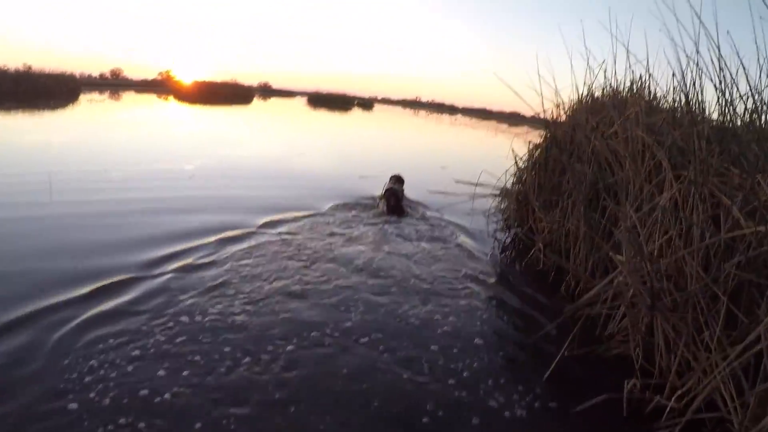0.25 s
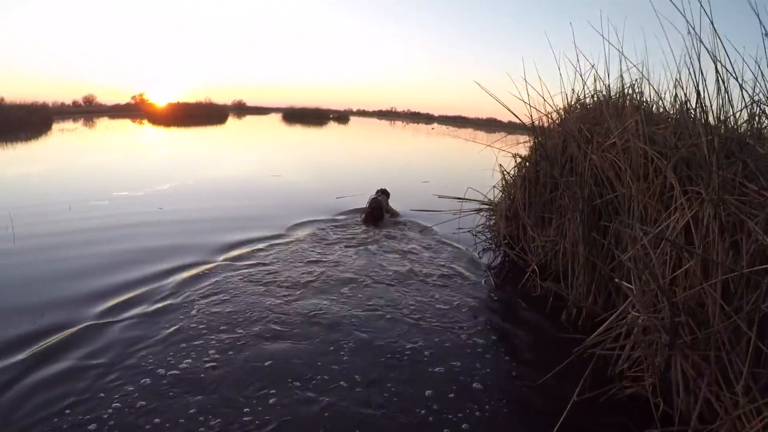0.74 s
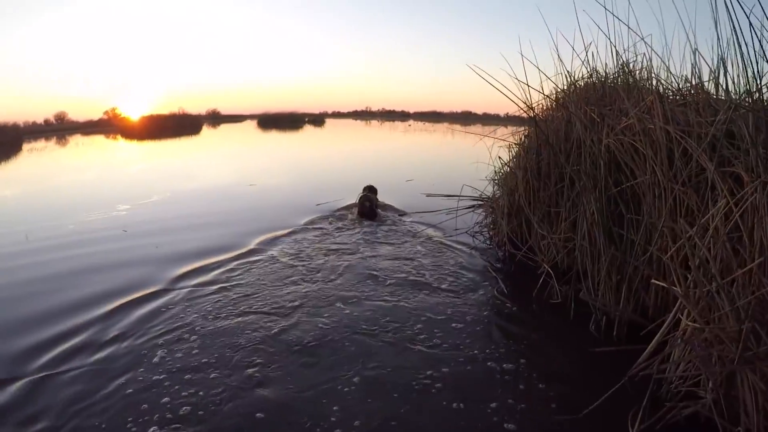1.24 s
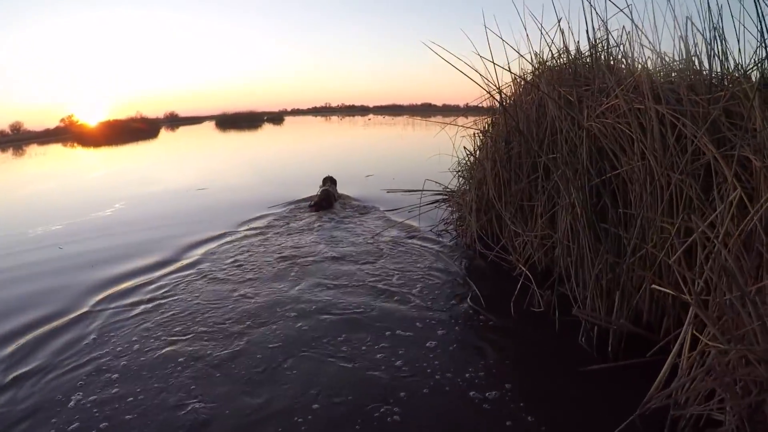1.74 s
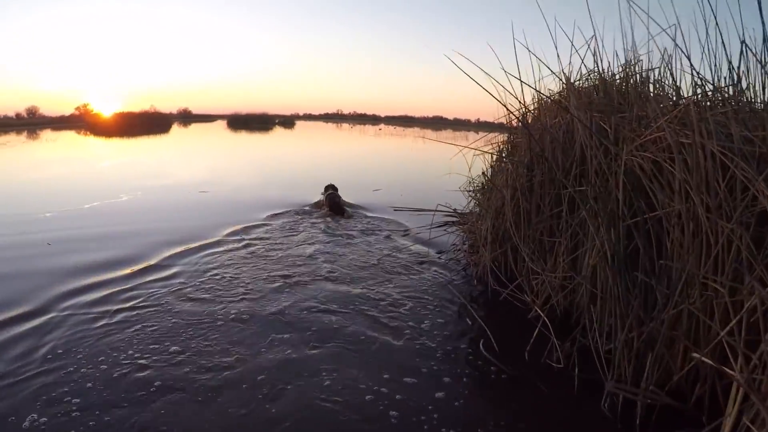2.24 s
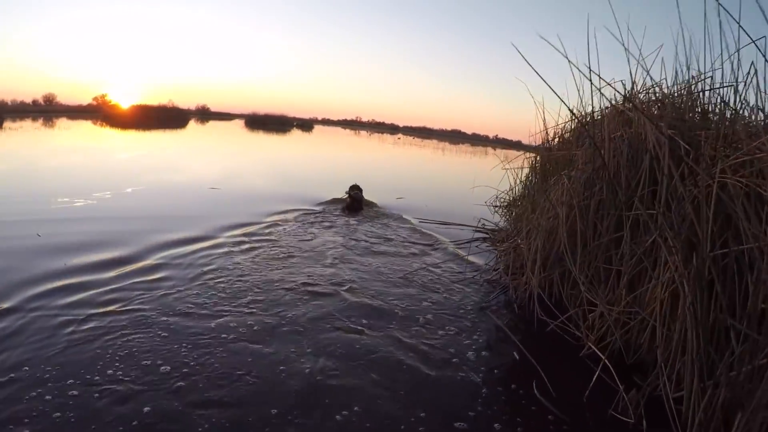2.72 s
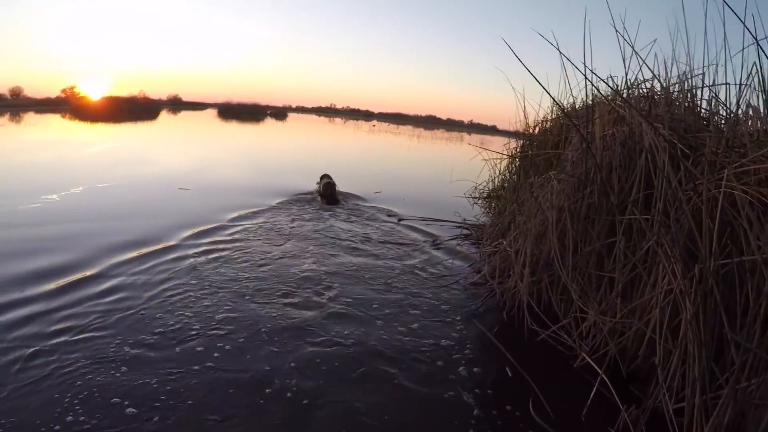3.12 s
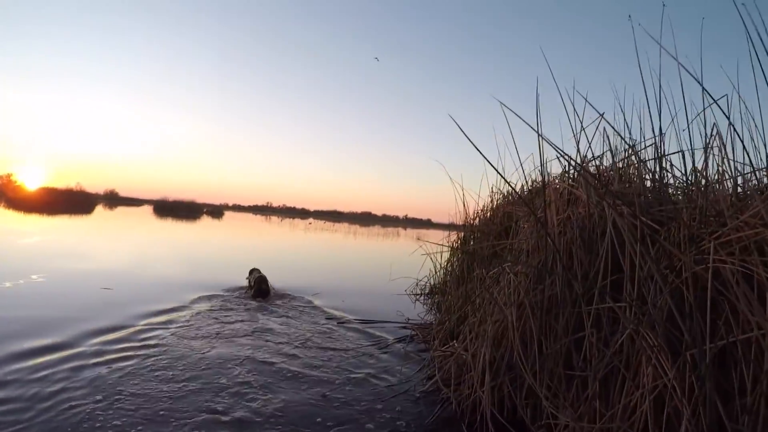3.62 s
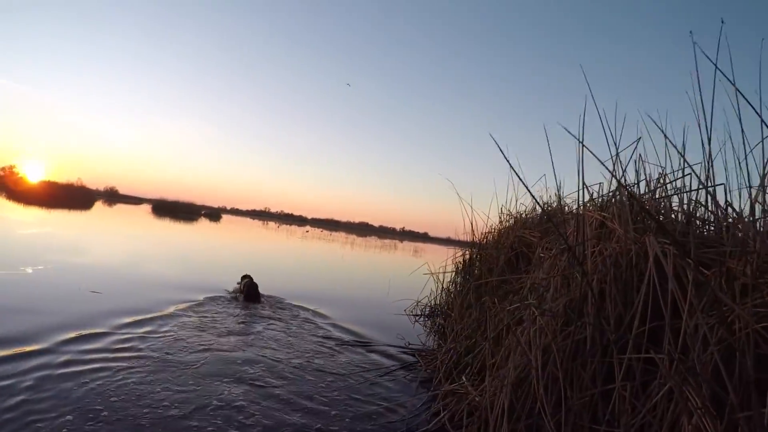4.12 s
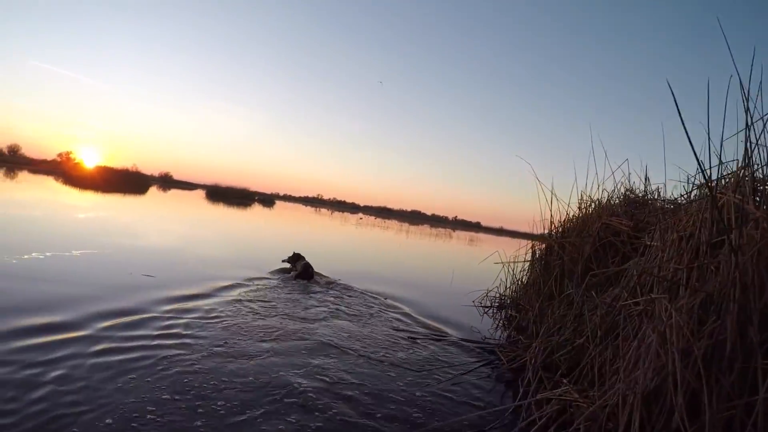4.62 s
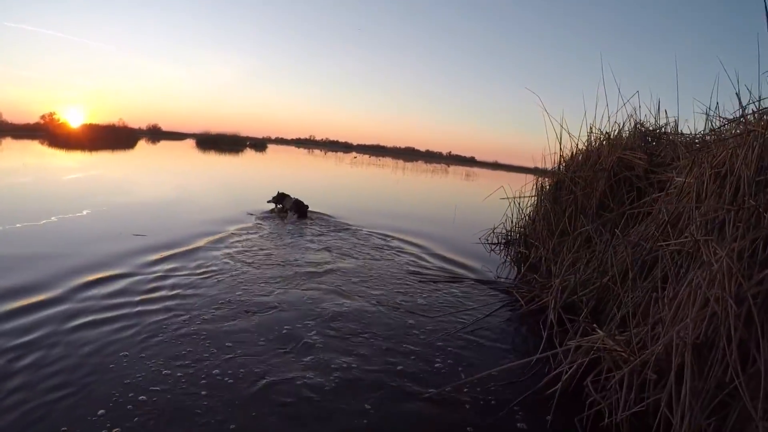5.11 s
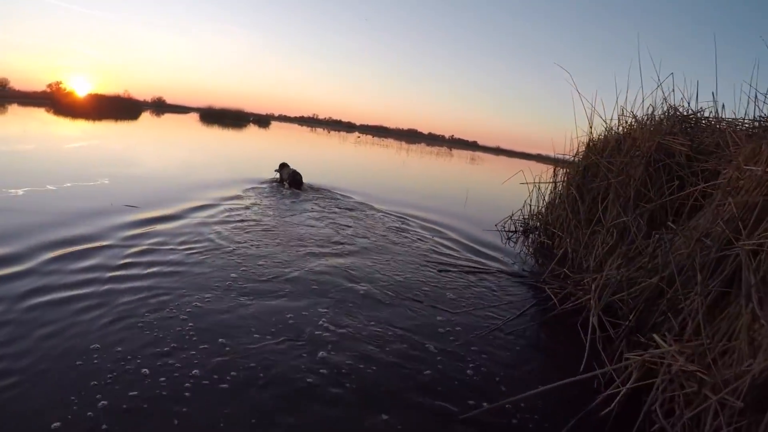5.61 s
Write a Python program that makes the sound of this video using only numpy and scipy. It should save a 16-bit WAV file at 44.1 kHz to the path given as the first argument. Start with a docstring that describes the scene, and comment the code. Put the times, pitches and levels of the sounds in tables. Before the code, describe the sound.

Legs push through shallow water in slow, regular strides, each a gurgling slosh ending in a small splash. The beginning is nearly windless, then a deep glug and sharp knocks on the body-worn camera arrive around one second. The brightest hissing splash and a thumping gust follow before two seconds. Afterward the wading is gentler, with droplets and dull wind rumble, in open air without echo.

```python
"""A shallow marsh, open and without walls, heard by a body-worn camera as someone wades.
Strides churn up a slosh of bubbles; waves break into splash, ticking crackle and a hiss of spray.
Air pockets glug, drops tick, and sheets of water slap: all are ringing bubbles or filtered noise.
Blows ring the camera housing, water smacks beside it, and wind rumbles as noise on its two ports.
A limiter pulls the gain down on loud peaks."""
import sys
import numpy as np
from scipy import signal
from scipy.fft import rfft, irfft
from scipy.io import wavfile
from scipy.ndimage import uniform_filter1d

SR = 44100
rng = np.random.default_rng(int(sys.argv[2]) if len(sys.argv) > 2 else 0)


def generate_wav(sig):
    """Save sig (samples, or channels by samples) to the path in sys.argv[1] as 16-bit PCM at SR."""
    pcm = np.round(np.clip(np.atleast_2d(sig).T, -1, 1) * 32767).astype(np.int16)
    wavfile.write(sys.argv[1], SR, pcm)


N = 258426
TIME = np.arange(N) / SR
HZ = np.fft.rfftfreq(N, 1 / SR)


def gain_of(db):
    """Decibels to gain."""
    return 10 ** (np.asarray(db) / 20)


def evened(x):
    """Scales to rms 1."""
    return x / np.sqrt(np.mean(x ** 2) + 1e-20)


def read(points):
    """Interpolates a table over log frequency."""
    f, value = np.transpose(points)
    return np.interp(np.log(HZ + 1), np.log(f + 1), value)


def add(mix, start_s, sound):
    """Mixes a sound in at start_s."""
    part = mix[round(start_s * SR):][:len(sound)]
    part += sound[:len(part)]


def coloured(x, colour):
    """Filters by a colour table."""
    return irfft(rfft(x) * gain_of(read(colour)), N)


def unit_band(pair, band_hz):
    """Scales a pair so that its mid signal has rms 1 within a band."""
    inside = (HZ > band_hz[0]) & (HZ < band_hz[1])
    mid = irfft(rfft(pair.mean(0)) * inside, N)
    return pair / np.std(mid)


def flutter(rate_hz, depth_db):
    """Gain wandering at random below about rate_hz, with an rms depth in dB."""
    slow = irfft(rfft(rng.standard_normal(N)) / (1 + (HZ / rate_hz) ** 4), N)
    return gain_of(depth_db * evened(slow))


# left port against right: (frequency [Hz], left lead [rad])
PORT_PHASE = [(100, 1.5), (350, -1.04), (700, -0.82), (1200, -3.5), (1900, -4.5), (3500, -5), (5200, -5.5),
              (7000, -8), (11000, -12)]
# left port against right: (frequency [Hz], left minus right [dB])
PORT_BALANCE = [(60, 0), (110, -1.0), (200, 0.5), (380, 1.5), (690, 0.5), (1270, -6), (2340, 0),
                (4320, -5.0), (7960, -7.5), (14700, -3)]


def ports(x):
    """Sound bends round the housing: mostly later and weaker at the left port."""
    half = gain_of(read(PORT_BALANCE) / 2) * np.exp(.5j * read(PORT_PHASE))
    return irfft(rfft(x) * np.array([half, 1 / half]), N)


def bubble(hz, cycles, rise, onset_cycles):
    """Air bubble: soft start, ring to -60 dB over the cycles, pitch gliding (up if rise > 0)."""
    turns = np.arange(int(cycles * SR / hz) + 2) * hz / SR
    swell = 1 - np.exp(-(turns / onset_cycles) ** 2)
    phase = 2 * np.pi * turns * (1 + rise * turns / cycles)
    ring = swell * gain_of(-60 * turns / cycles) * np.sin(phase)
    return ring / abs(ring).max()


CLUMP_S, CLUMP_DB = 0.025, 3  # step length; level per standard deviation


def cloud(band_hz, per_s, cycles, rise, scatter_db, spread_ms, wash, onset_cycles=0.56, count=36):
    """Bubbles of many sizes, clumped in level and gliding up or down, over a noise wash of tiny ones."""
    pair = np.zeros((2, N))
    clumps = evened(uniform_filter1d(rng.standard_normal((count, SR)), size=4, axis=0))
    for hz, clump in zip(np.geomspace(*band_hz, count), clumps):
        chance, size = rng.random(N), rng.standard_exponential(N)
        at = np.flatnonzero(chance < per_s / count / SR)
        # random lag between ports: many directions
        lag = (rng.standard_normal(N)[at] * spread_ms * SR / 1000).round().astype(int)
        clump_db = CLUMP_DB * np.minimum(clump[(TIME[at] / CLUMP_S).astype(int) % SR], 2)
        strength = gain_of(scatter_db * np.minimum(size[at], 3) + clump_db)
        clicks = np.zeros((2, N))
        clicks[0, at] = strength
        clicks[1, (at + lag) % N] = strength
        ring = bubble(hz, cycles, rise * rng.uniform(-1.2, 1.94), onset_cycles)
        pair += signal.oaconvolve(clicks, ring[None] / np.linalg.norm(ring), axes=1)[:, :N]
    pink = irfft(rfft(rng.standard_normal((2, N))) / np.sqrt(HZ + band_hz[0]), N)
    return evened(pair) + wash * evened(pink)


def resonate(x, hz, width_hz):
    """Resonance of gain 1 following the curve hz: shift to 0 Hz, low-pass, shift back."""
    turn = np.exp(2j * np.pi * np.cumsum(hz) / SR)
    r = np.exp(-np.pi * width_hz / SR)
    return 2 * (turn * signal.lfilter([1 - r], [1, -r], x / turn)).real


# legs pushing through water:
# (start [s], build-up [s], length [s], level [dB], easing [dB/s])
STRIDES = [(-0.06, 0.099, 0.28, -38.5, -7), (0.474, 0.028, 0.69, -37.5, -6),
           (1.276, 0.043, 0.81, -35, 10.5), (2.08, 0.21, 0.55, -32, 21), (2.998, 0.12, 0.58, -35, 2),
           (3.789, 0.2, 0.82, -34.5, 5.5), (4.73, 0.43, 0.77, -32.5, 9)]
SETTLE_DB_PER_S = 144  # added once the leg stops
LAP_SLOSH_DB = -43.5  # wake between strides


def push():
    """Slosh level: each stride builds, eases off (or grows) and settles, over the lapping wake."""
    power = gain_of(LAP_SLOSH_DB) ** 2
    for start, build, length, db, easing in STRIDES:
        age = np.maximum(TIME - start, 0)
        fade_db = easing * np.maximum(age - build, 0)
        fade_db = fade_db + SETTLE_DB_PER_S * np.maximum(age - length, 0)
        power = power + (np.minimum(age / build, 1) * gain_of(db - fade_db)) ** 2
    return np.sqrt(power)


# slosh spectrum: (frequency [Hz], gain [dB])
SLOSH_COLOUR = [(90, -62), (120, -19), (150, -4), (300, -2), (500, -4), (850, -2), (1300, -3.5),
                (2200, -18)]
# bubbles grow as the leg digs in: the gurgle slides down from GURGLE_HZ
GURGLE_HZ, GURGLE_FALL_OCTAVES_PER_S, GURGLE_WIDTH_HZ, GURGLE_DB = 765, 3.9, 490, -6


def slosh():
    """Small and large bubbles, with a resonance sliding down through each stride as bubbles grow."""
    starts = np.transpose(STRIDES)[0]
    age = TIME - starts[np.searchsorted(starts, TIME) - 1]
    small = cloud((380, 1700), per_s=850, cycles=28.6, rise=0.26, scatter_db=2.0, spread_ms=0.15,
                  wash=0.23, onset_cycles=0.76, count=24)
    large = cloud((135, 430), per_s=800, cycles=10.6, rise=0.2, scatter_db=2.0, spread_ms=0.23,
                  wash=0.18, onset_cycles=0.78, count=18)
    water = small + gain_of(-6.5) * large
    gurgle_hz = GURGLE_HZ * 2 ** (-GURGLE_FALL_OCTAVES_PER_S * age)
    water = water + gain_of(GURGLE_DB) * resonate(water, gurgle_hz, GURGLE_WIDTH_HZ)
    water = ports(coloured(water, SLOSH_COLOUR)) * flutter(rate_hz=6.8, depth_db=1.37)
    return unit_band(water, (280, 900))


# waves breaking:
# (crest time [s], rise [s], fall [s], splash level [dB], spray level [dB])
WAVES = [(0.161, 0.35, 0.15, -32.5, -30), (0.83, 0.033, 0.26, -44, -36), (0.992, 0.3, 0.029, -33, -28.5),
         (1.121, 0.19, 0.084, -32, -27.5), (1.185, 0.11, 0.036, -31.5, -42), (1.348, 0.14, 0.11, -37, -40),
         (1.481, 0.077, 0.036, -28.5, -32.5), (1.705, 0.17, 0.19, -34, -26.5),
         (1.818, 0.15, 0.14, -25.5, -24), (2.557, 0.31, 0.19, -33, -33.5), (2.56, 0.035, 0.059, -53, -31),
         (3.46, 0.29, 0.23, -34, -34.5), (3.59, 0.22, 0.09, -32.5, -34), (4.42, 0.18, 0.15, -32, -33.5),
         (5.09, 0.19, 0.21, -35.5, -37.5), (5.31, 0.32, 0.32, -33, -35.5), (5.459, 0.14, 0.077, -31, -31)]
WAVE_DROP_DB, WAVE_ROUNDNESS = 15.5, 1  # drop over one rise or fall time; 1 = pointed crest, 2 = round
LAP_SPLASH_DB, LAP_SPLASH_GROWTH_DB_PER_S = -46, 0.42
LAP_SPRAY_DB, LAP_SPRAY_FADE_DB_PER_S = -48, 0.27


def breaking():
    """Splash and spray levels: each wave swells to a crest and collapses, over the lapping wake."""
    splash_power = gain_of(LAP_SPLASH_DB + LAP_SPLASH_GROWTH_DB_PER_S * TIME) ** 2
    spray_power = gain_of(LAP_SPRAY_DB - LAP_SPRAY_FADE_DB_PER_S * TIME) ** 2
    for crest, rise, fall, splash_db, spray_db in WAVES:
        away = np.maximum((crest - TIME) / rise, (TIME - crest) / fall)
        swell = gain_of(-WAVE_DROP_DB * np.minimum(away, 10) ** WAVE_ROUNDNESS)
        splash_power = splash_power + (gain_of(splash_db) * swell) ** 2
        spray_power = spray_power + (gain_of(spray_db) * swell) ** 2
    return np.sqrt(splash_power), np.sqrt(spray_power)


# splash spectrum: (frequency [Hz], gain [dB])
SPLASH_COLOUR = [(300, -24), (850, -10.5), (1200, -3.5), (1750, 1), (2100, -1.5), (2600, -11.5), (3300, -9),
                 (4300, -25)]


def splash():
    """Small bubbles and droplets of the breaking wave: a bubble cloud over strong noise."""
    water = cloud((800, 4200), per_s=1100, cycles=58, rise=0.12, scatter_db=2.0, spread_ms=0.031, wash=0.94)
    water = ports(coloured(water, SPLASH_COLOUR)) * flutter(rate_hz=8.0, depth_db=0.15)
    return unit_band(water, (1200, 2500))


def crackle():
    """Larger droplets standing out of the splash: sparse short rings of widely scattered level."""
    ticks = cloud((1500, 8000), per_s=160, cycles=8.8, rise=0, scatter_db=6.0, spread_ms=0.027,
                  wash=0, count=16)
    return gain_of(-10.5) * evened(ports(ticks))


# spray spectrum: (frequency [Hz], gain [dB])
SPRAY_COLOUR = [(1200, -19), (2400, -3), (3300, -0.5), (4400, -1), (5400, 2.5), (7200, 7), (8300, -1),
                (10200, -2.5), (11500, -8), (13500, -13), (15000, -54)]
# second colour of the hiss: (frequency [Hz], gain [dB])
SECOND_COLOUR = [(2400, 0.5), (3300, 5), (4400, 0.5), (6500, 1), (9000, 2), (14000, -2)]
# two times [s] for the interpolation of the hiss colour, in descending order:
# the colour steps at the second one
COLOUR_TIMES_S = [4.8, 2.5]


def spray():
    """Finest droplets merging into a grainy hiss, which steps to a second colour partway through."""
    water = cloud((2000, 14000), per_s=4000, cycles=58, rise=0.016, scatter_db=1.0, spread_ms=0.028,
                  wash=1.0, count=48)
    share = np.interp(TIME, COLOUR_TIMES_S, [0, 1])
    water = (1 - share) * water + share * coloured(water, SECOND_COLOUR)
    water = ports(coloured(water, SPRAY_COLOUR)) * flutter(rate_hz=25, depth_db=1.27)
    return unit_band(water, (4000, 12000))


# large air pockets closing:
# (time [s], level [dB], pitch [Hz], pitch change over the ring [share])
GULPS = [(0.022, -24, 193, 0.56), (4.951, -25.5, 336, 0.42), (0.646, -28.5, 347, -1.7),
         (0.737, -27, 747, -1.5), (0.76, -23.5, 186, .3), (0.783, -25.5, 365, 0.024),
         (0.835, -26, 160, -0.24), (0.857, -20, 233, -1.14), (1.003, -5.5, 180.4, -0.2),
         (1.054, -16, 189, 0.023), (1.354, -23.5, 552, 0.82), (1.389, -21, 460, -0.96),
         (1.554, -22.5, 278, -1.2), (2.156, -28, 370, 0.57), (2.18, -26.5, 594, 1.1),
         (2.236, -19, 328, -0.37), (2.325, -28, 560, 1.04), (2.619, -26, 447, -0.38),
         (2.88, -28, 674, 0.74), (2.912, -29, 730, 0.7), (3.228, -23.5, 352, 0.15), (3.84, -28.5, 630, 0.7),
         (4.284, -23.5, 230, -0.9), (4.515, -18.5, 151, -0.51), (4.541, -25, 195, 0.77),
         (4.803, -25.5, 354, -0.48), (5.331, -14, 149, -1.15), (5.354, -16.5, 195, -0.8)]
GULP_RING_S, GULP_SWELL_S = 0.0615, 0.005


def gulps():
    """Air pockets closing behind a leg: glugs sliding in pitch as they rise or are dragged under."""
    out = np.zeros(N)
    for s, db, hz, glide in GULPS:
        add(out, s, gain_of(db) * bubble(hz, hz * GULP_RING_S, glide / 2, hz * GULP_SWELL_S))
    high_pass = signal.butter(4, 115, "highpass", fs=SR, output="sos")
    return ports(signal.sosfilt(high_pass, out))


# drops landing near the camera: (time [s], level [dB], pitch [Hz])
DROPS = [(0.163, -21, 6160), (2.3652, -13, 5940), (2.4527, -14, 6260), (2.841, -17.5, 1700),
         (2.982, -26, 1710), (3.816, -20, 2070), (3.817, -18, 6000), (4.433, -8.5, 1790),
         (4.521, -20, 3300), (5.419, -13.5, 3500), (5.4848, -14, 6070), (5.541, -13.5, 7300),
         (5.64, -25.5, 6700)]
# tick of a drop on the surface: (frequency [Hz], gain [dB])
TICK_COLOUR = [(500, -14), (1600, 13), (3200, 5), (4400, -21), (6500, 1), (9000, -3), (15000, -24.5)]


def drops():
    """Each drop: a broad noise tick and a very short bubble ring."""
    rings, ticks = np.zeros(N), np.zeros(N)
    t = np.arange(SR // 50) / SR
    for s, db, hz in DROPS:
        add(rings, s, gain_of(db) * bubble(hz, cycles=14, rise=0.023, onset_cycles=1.0))
        add(ticks, s, gain_of(db) * rng.standard_normal(len(t)) * np.exp(-t / 0.0012))
    return ports(rings + gain_of(-5.0) * coloured(ticks, TICK_COLOUR))


# sheets of water slapping down: (time [s], level [dB], pitch [Hz], length [s])
SLAPS = [(0.477, -26, 1230, 0.025), (0.869, -25, 960, .045), (1.001, -14, 2400, 0.0096),
         (1.378, -20, 2230, .02), (1.457, -13.5, 2160, 0.045), (1.924, -19.5, 1550, .012),
         (3.334, -16, 1460, .012), (4.741, -19, 1340, 0.021), (5.067, -15.5, 1800, 0.016)]


def slaps():
    """A falling sheet traps a tight clump of like-sized bubbles."""
    out = np.zeros(N)
    for s, db, hz, length in SLAPS:
        clump = np.zeros(SR // 8)
        for when, size, strength in rng.random((40, 3)):
            pitch_hz = hz * 1.27 ** (2 * size - 1)
            ring = bubble(pitch_hz, cycles=36, rise=0.019, onset_cycles=0.53)
            add(clump, when * length, strength * ring)
        add(out, s, gain_of(db) * clump / abs(clump).max())
    return ports(out)


# water smacking beside the camera:
# (time [s], level [dB], decay [s], pitch [Hz], direction [1 side, 0 front])
SMACKS = [(1.003, -17, 0.0083, 1730, 0), (1.06, -26.5, 0.019, 1320, 0), (1.4093, -13, 0.0017, 1400, 0),
          (1.735, -19, 0.031, 780, 1), (1.852, -24, 0.017, 700, 1), (2.2324, -25.5, .005, 667, 0)]
POPS_PER_S, POP_DAMPING_PER_CYCLE = 2000, 1.05


def smacks():
    """A crack and dying crackle of damped pops; from the side, it presses one port and pulls the other."""
    front, side = np.zeros(N), np.zeros(N)
    t = np.arange(SR // 10) / SR
    for s, db, decay, hz, sideways in SMACKS:
        pops = (rng.random(len(t)) < POPS_PER_S / SR) * rng.standard_normal(len(t))
        pops[0] = 2  # the crack
        pop = np.sin(2 * np.pi * hz * t) * np.exp(-POP_DAMPING_PER_CYCLE * hz * t)
        burst = signal.fftconvolve(pops * np.exp(-t / decay), pop)[:len(t)]
        burst = evened(burst) * np.sqrt(decay / t[-1])
        add(side if sideways > .5 else front, s, gain_of(db) * burst)
    return ports(front) + np.array([side, -side])


# blows on the camera: (time [s], level [dB], contact time [ms], left port lag [ms])
KNOCKS = [(1.011, -5.5, 0.23, 0.72), (1.0169, -2.5, 0.26, 0.68), (1.1988, 0.2, 0.3, -0.38),
          (1.2021, -6, 1.6, 0), (1.221, -11.5, 1.1, 0.36), (1.305, -14, 0.79, 1), (1.4131, -8, 1.22, -0.51)]
# housing resonances: (frequency [Hz], level [dB], t60 [s])
HOUSING = [(63.5, 3, 0.079), (168, 10, 0.028), (266, 8.5, 0.028), (583, -5, 0.017), (920, 14.5, 0.012),
           (1540, -3, 0.013)]


def knocks():
    """Blows press, rebound and ring the housing, nearer port first; longer contact is duller."""
    out = np.zeros((2, N))
    t = np.arange(SR // 6) / SR
    ring = sum(gain_of(db - 60 * t / t60) * np.cos(2 * np.pi * hz * t) for hz, db, t60 in HOUSING)
    for s, db, contact_ms, lag_ms in KNOCKS:
        u = 1000 * t / contact_ms
        force = u * (2 - u) * np.exp(-u)
        blow = signal.fftconvolve(ring, force)[:len(t)]
        for port, at_s in zip(out, (s + lag_ms / 1000, s)):
            add(port, at_s, gain_of(db) * blow / abs(blow).max())
    return out


# breeze picking up from calm: (time [s], level [dB])
BREEZE = [(0.0, -87), (0.8, -62), (1.22, -30), (1.5, -48), (1.95, -25.5), (2.3, -28.5), (3.5, -24.5),
          (4.7, -27), (5.86, -24)]
# gusts on top: (time [s], level [dB], half width to 1/e [s])
GUSTS = [(1.72, -16, 0.23), (2.85, -23.5, 0.11), (5.57, -27, 0.068)]


def blowing():
    """Wind level: the breeze with bell-shaped gusts, summed in power."""
    power = gain_of(np.interp(TIME, *np.transpose(BREEZE))) ** 2
    for s, db, width in GUSTS:
        power = power + (gain_of(db) * np.exp(-((TIME - s) / width) ** 2)) ** 2
    return np.sqrt(power)


# wind spectrum: (frequency [Hz], gain [dB])
WIND_COLOUR = [(4, 1.5), (14, 10), (27, 1), (50, -6), (80, -15.5), (120, -22.5), (250, -45), (600, -47),
               (2000, -87)]
FLAP_DB = 0.5  # applied to the square of the wind level
WIND_PORT_DB = np.array([[-1.6], [1.6]])  # left, right


def wind():
    """Large eddies press both ports at once; small ones hit each port alone and flap in gusts."""
    shared = rng.standard_normal(N)
    own = irfft(rfft(rng.standard_normal((2, N))) * np.minimum(HZ / 130, 1.5), N)
    rumble = coloured(shared + own, WIND_COLOUR) * gain_of(WIND_PORT_DB)
    flap_filter = signal.butter(2, (90, 300), "bandpass", fs=SR, output="sos")
    flap = signal.sosfilt(flap_filter, rng.standard_normal((2, N)))
    level = blowing()
    return level * unit_band(rumble, (15, 100)) + gain_of(FLAP_DB) * level ** 2 * evened(flap)


# single strong eddies striking the ports: (time [s], level [dB])
BUFFETS = [(1.638, -14), (1.687, -12), (1.73, -9), (1.81, -10.5)]


def buffets():
    """A strong eddy: a rounded pressure dip between two soft swells."""
    out = np.zeros(N)
    for s, db in BUFFETS:
        u = (TIME - s) / 0.0047
        out -= gain_of(db) * (1 - u ** 2) * np.exp(-u ** 2 / 2)
    return out * gain_of(WIND_PORT_DB)


def scene():
    """Open water, no walls: everything arrives dry."""
    splash_level, spray_level = breaking()
    water = push() * slosh() + splash_level * (splash() + crackle()) + spray_level * spray()
    return water + gulps() + drops() + slaps() + smacks() + knocks() + wind() + buffets()


# the held overshoot falls at a fixed rate; LIMIT_SHARE of it is taken off the gain
LIMIT_DB, OVERSHOOT_FALL_DB_PER_S, LIMIT_SHARE = -5.5, 70, 0.43


def limited(x):
    """Limiter: peaks over the threshold pull the gain down, and it creeps back."""
    over_db = np.maximum(20 * np.log10(abs(x).max(0) + 1e-9) - LIMIT_DB, 0)
    recovery = OVERSHOOT_FALL_DB_PER_S * TIME
    held_db = np.maximum.accumulate(over_db + recovery) - recovery
    keep = np.exp(-1 / (0.004 * SR))  # 4 ms smoothing
    return x * gain_of(-LIMIT_SHARE * signal.lfilter([1 - keep], [1, -keep], held_db))


EDGE_HZ = 15000


def record(dry):
    """The recorder: limiter, clipping at full scale, low-pass at EDGE_HZ."""
    low_pass = signal.firwin(511, EDGE_HZ, window=("kaiser", 9), fs=SR)
    return signal.oaconvolve(np.clip(limited(dry), -1, 1), low_pass[None], "same")


dry = scene()
out = record(dry)
generate_wav(out)
```